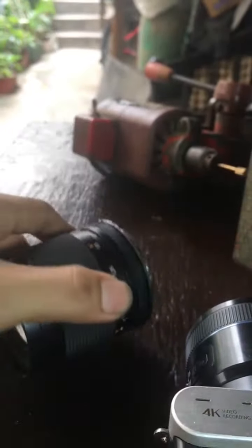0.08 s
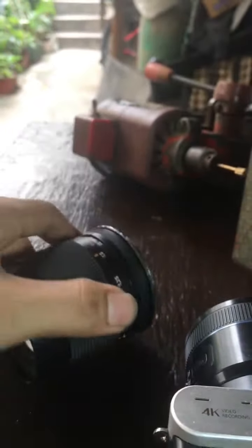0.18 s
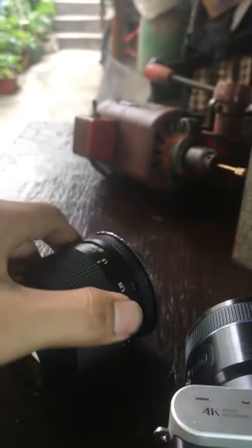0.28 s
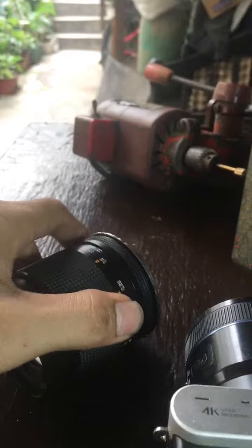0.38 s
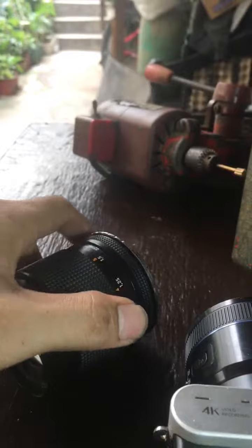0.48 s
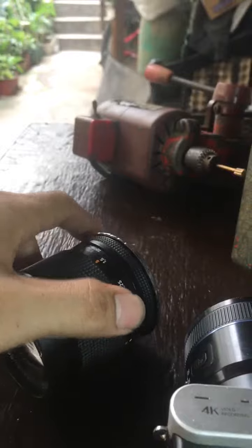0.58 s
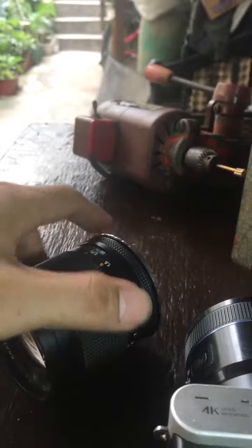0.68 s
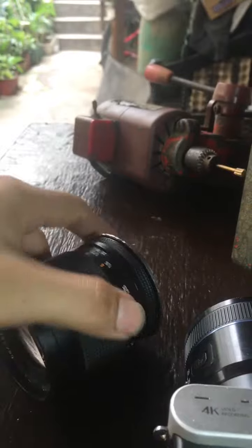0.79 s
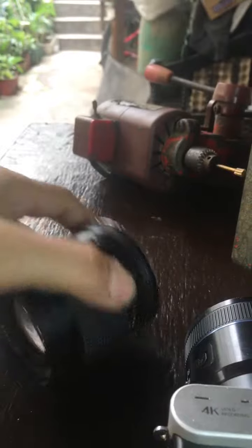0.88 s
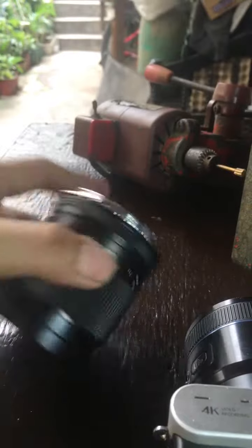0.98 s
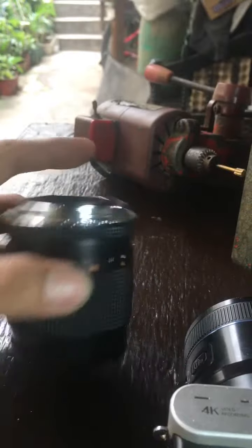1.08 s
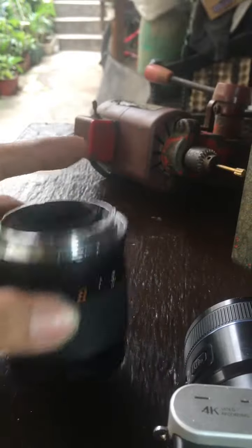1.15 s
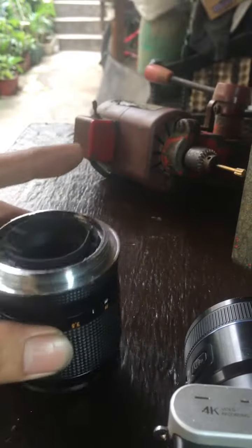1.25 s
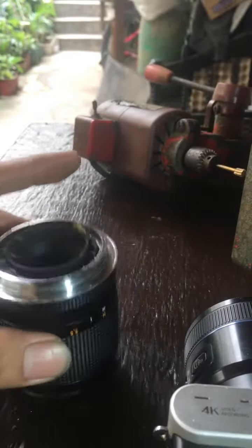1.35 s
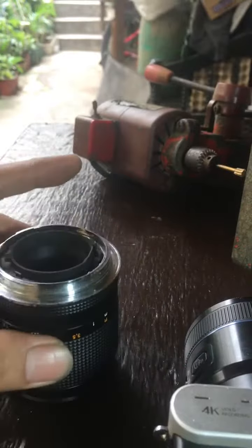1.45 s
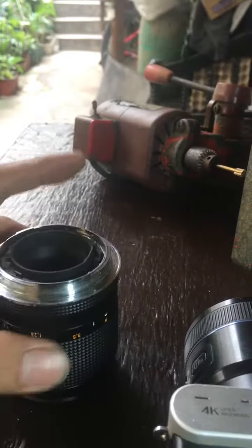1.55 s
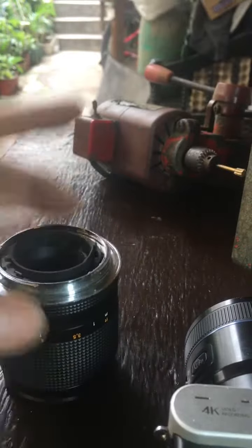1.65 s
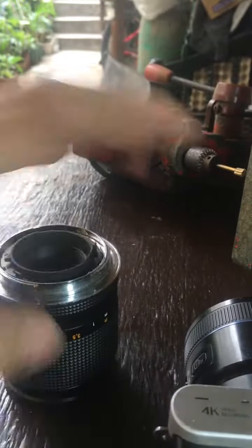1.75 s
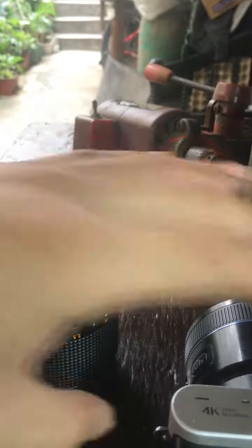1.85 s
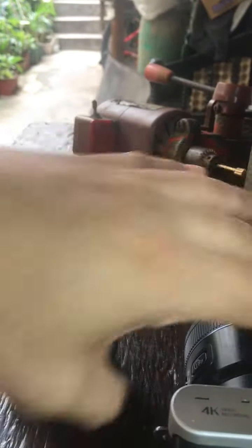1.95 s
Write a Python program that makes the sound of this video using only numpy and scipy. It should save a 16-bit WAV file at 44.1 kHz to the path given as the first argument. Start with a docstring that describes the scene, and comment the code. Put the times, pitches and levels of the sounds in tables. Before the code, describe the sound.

Two hard, woody knocks of a camera lens on a table, with faint nudges and low hum

```python
"""The low hum of a workshop and a faint, thin electrical whine lie under everything, as wavering sine tones
over filtered noise. A camera lens knocks on a wooden table while tilted, then is stood on its end: two knocks,
each with a quick rebound, made of table modes, noise-rung rim clicks and barrel modes, with a short room tail.
Fingers nudge the lens in between, and the hand bumps the table softly, a sinking sine, as it lets go."""
import sys
import numpy as np
from scipy import signal
from scipy.fft import rfft, irfft
from scipy.io import wavfile
from scipy.ndimage import uniform_filter1d

SR = 44100
rng = np.random.default_rng(int(sys.argv[2]) if len(sys.argv) > 2 else 0)


def pcm_store(signal):
    """Save signal as 16-bit PCM."""
    levels = np.round(np.clip(np.atleast_2d(signal), -1, 1) * 32767)
    wavfile.write(sys.argv[1], SR, levels.astype(np.int16).T)


N = 88200

# Blows of the lens on the table: (time [s], relative thump level [dB], contact [ms],
# relative clack level [dB], lens pose [0 tilted, 1 upright])
LENS_BLOWS = [(0.2239, 1, 2.49, 1.5, 0), (0.2333, 2.05, 2.77, -7, 0), (0.4, -38.5, 2.8, -47, 0),
              (0.815, -32, 2.73, -51, 0), (0.848, -39, 2.57, -51, 0), (1.328, -29.5, 2.8, -27.5, 0),
              (1.3373, -35, 4.7, -29.5, 0), (1.3832, 0.37, 2.23, -1.5, 1), (1.393, -3.5, 2.86, -15.5, 1),
              (1.42, -12, 2.39, -16.5, 1), (1.632, -37.5, 3.4, -36, 1), (1.756, -32.5, 3.67, -48, 1),
              (1.775, -30, 4.54, -60, 1), (1.901, -34, 5.3, -57, 1)]
CLACK_LEAD_S = 0.0013  # clack and barrel start this much before the thump


def amp(db):
    """Decibels to gain."""
    return 10 ** (np.asarray(db) / 20)


def unit(x):
    """Scales to rms 1."""
    return x / np.sqrt(np.mean(abs(x) ** 2) + 1e-20)


def decay(t, t60):
    """Exponential fade that falls 60 dB in t60 seconds."""
    return np.exp(-np.log(1000) * t / t60)


def read(points, hz):
    """Reads a table on a log-frequency axis."""
    f, value = np.transpose(points)
    return np.interp(np.log(hz + 1), np.log(f), value)


def add(mix, s, sound):
    """Mixes a sound in at time s, cut off at the end of the mix."""
    part = mix[round(s * SR):][:len(sound)]
    part += sound[:len(part)]


def impulse(points, size=4096):
    """A causal, minimum-phase click of energy 1 with the given spectrum shape."""
    hz = abs(np.fft.fftfreq(size, 1 / SR))
    log_gain = np.log(amp(read(points, hz)))
    spectrum = np.exp(np.conj(signal.hilbert(log_gain)))
    click = np.fft.ifft(spectrum).real[:size // 2]
    return click / np.linalg.norm(click)


def tones(table):
    """Sine tones whose phase wanders at random, which widens each spectral line."""
    out = np.zeros(N)
    for hz, db, width_hz in table:
        wander = uniform_filter1d(rng.standard_normal(N), size=220)
        drift = np.sqrt(2 * np.pi * abs(width_hz) / SR) * wander
        phase = np.cumsum(2 * np.pi * hz / SR + drift)
        out += amp(db) * unit(np.sin(phase))
    return out


def background():
    """Low rumble and faint hiss of the workshop: shaped noise, drifting a little in patches."""
    # Spectrum of the workshop: (frequency [Hz], relative density [dB per Hz])
    floor_shape = [(20, -10), (42, -12), (55, -11), (74, -0.5), (95, -11.5), (118, -5.5), (150, -16.5),
                   (260, -22), (430, -27), (780, -34), (1100, -33.5), (1650, -33.5), (2300, -40),
                   (3300, -49.5), (5000, -55), (6000, -52.5), (7800, -59), (9000, -47.5), (10000, -59.5),
                   (11500, -52.5), (14000, -56.5), (15700, -63)]
    floor_db, patch_db = -44.5, 0.7  # both rms
    _, _, z = signal.stft(rng.standard_normal(N), SR, nperseg=512)
    patches = uniform_filter1d(rng.standard_normal(z.shape), size=9, axis=0)  # along frequency
    patches = unit(uniform_filter1d(patches, size=10, axis=1))  # along time
    noise = signal.istft(z * amp(patch_db * patches), SR)[1][:N]
    gain = amp(read(floor_shape, np.fft.rfftfreq(N, 1 / SR)))
    return amp(floor_db) * unit(irfft(rfft(noise) * gain, N))


def hum():
    """Low workshop hum: wavering tones that swell and sink slowly together."""
    # Tones of the hum: (frequency [Hz], rms level before the swell [dB], line width [Hz])
    hum_tones = [(74.7, -49.5, 5), (118.7, -57.5, 7.4), (393, -71.5, 5), (459, -70, 3.7)]
    # Slow swell of the hum: (time [s], level [dB])
    swell = [(0, 0), (0.799, 3), (1.1, -6), (1.6, -2), (2, -1)]
    swell_db = np.interp(np.arange(N) / SR, *np.transpose(swell))
    return tones(hum_tones) * amp(swell_db)


def whine():
    """Thin electrical whine: faint, high, narrow tones."""
    # Tones of the whine: (frequency [Hz], rms level [dB], line width [Hz])
    whine_tones = [(3073, -81, 2), (9217, -82, 2), (12290, -84, 2), (15388, -90, 8)]
    return tones(whine_tones)


def clacks():
    """The hard rim clicks just ahead of the thump and rings briefly in many close modes."""
    # Clack of the barrel on the wood: (frequency [Hz], relative density [dB per Hz])
    clack_shape = [(200, -3.5), (500, 14.5), (750, -9), (1100, 1.5), (1400, -9), (1600, -12), (2200, -11),
                   (2900, -33.5), (4200, -34), (5000, -44.5), (6000, -39.5), (8000, -52.5), (15000, -58.5)]
    clack_db, ring_db, ring_t60_s = 3, -4.5, 0.056  # ring energy is relative to the direct click
    t, out = np.arange(SR // 4) / SR, np.zeros(N)
    click = impulse(clack_shape)
    for s, _, _, db, _ in LENS_BLOWS:
        # Decaying noise stands for the many close modes.
        ring = rng.standard_normal(len(t)) * decay(t, ring_t60_s)
        ring *= amp(ring_db) / np.linalg.norm(ring)
        ring[0] += 1  # the direct click
        clack = signal.fftconvolve(ring, click)
        add(out, s - CLACK_LEAD_S, amp(clack_db + db) * clack)
    return out


def barrel():
    """The lens barrel rings briefly in its own modes, damped by the fingers."""
    # Modes of the barrel: (frequency [Hz], level when tilted [dB], level when upright [dB]),
    # both levels relative to the clack level of the blow
    barrel_modes = [(892, -35.5, -35.5), (1008, -35.5, -24.5), (1110, -64, -33.5), (1175, -34.5, -56),
                    (1264, -42, -44), (1415, -33.5, -38), (1553, -42.5, -66), (2070, -45.5, -64),
                    (2054, -49, -67)]
    barrel_t60_s = 0.057
    t, out = np.arange(SR // 4) / SR, np.zeros(N)
    for s, _, _, db, upright in LENS_BLOWS:
        pose = int(upright > 0.5)
        ring = np.zeros(len(t))
        for k, (hz, *levels) in enumerate(barrel_modes):
            sign = (-1) ** k  # neighbouring modes start in opposite directions
            ring += sign * amp(levels[pose]) * np.sin(2 * np.pi * hz * t)
        add(out, s - CLACK_LEAD_S, amp(db) * ring * decay(t, barrel_t60_s))
    return out


def thumps():
    """Each blow is a smooth push on the table's modes; a longer contact sounds duller."""
    # Modes of the table: (frequency [Hz], 60 dB decay time [s],
    # relative level under the tilted lens [dB], relative level under the upright lens [dB])
    table_modes = [(76.56, 0.39, -19.5, -20.5), (109.3, 0.23, -21.5, -21.5), (124.4, .15, -13, -16),
                   (156, 0.091, -19.5, -9.5), (209, 0.31, -25.5, -22.5), (233.3, 0.069, -9, -7.5),
                   (330.2, 0.14, -20, -19.5), (355, 0.13, -10, -7.5), (408, 0.11, -15.5, -11.5),
                   (423.8, 0.25, -27.5, -33.5), (459.4, 0.064, -5.5, -7.5), (551.7, .13, -23, -6),
                   (581.4, 0.097, -6, -13.5)]
    bass_cut_hz = 52.3
    t, out = np.arange(SR) / SR, np.zeros(N)
    rings = np.zeros((2, len(t)))  # tilted, upright
    for hz, t60, *levels in table_modes:
        for pose in (0, 1):
            rings[pose] += amp(levels[pose] - 60 * t / t60) * np.cos(2 * np.pi * hz * t)
    for s, db, contact_ms, _, upright in LENS_BLOWS:
        push = np.sin(np.pi * np.minimum(t * 1000 / contact_ms, 1)) ** 2
        thump = signal.fftconvolve(push / push.sum(), rings[int(upright > 0.5)])[:SR]
        add(out, s, amp(db) * thump)
    return signal.sosfilt(signal.butter(3, bass_cut_hz, "high", fs=SR, output="sos"), out)


def bump():
    """A soft, damped thud whose pitch sinks as the hand settles."""
    start_s, length_s, level_db = 1.902, 0.064, -25.5
    first_hz, last_hz, settle_s = 163, 73, 0.011  # settle_s is the time constant of the sinking
    attack_s, release_s = 0.0082, 0.03
    t, out = np.arange(0, length_s, 1 / SR), np.zeros(N)
    hz = last_hz + (first_hz - last_hz) * np.exp(-t / settle_s)
    ramp = np.clip(np.minimum(t / attack_s, (length_s - t) / release_s), 0, 1)
    level = np.sin(np.pi / 2 * ramp) ** 2
    thud = level * np.sin(2 * np.pi * np.cumsum(hz) / SR)
    add(out, start_s, -amp(level_db) * thud)
    return out


def room(x):
    """A short diffuse workshop tail: noise decaying at its own rate in each band, slowest in the bass."""
    # Reverberation of the workshop: (frequency [Hz], 60 dB decay time [s])
    room_decay = [(100, 0.48), (400, 0.12), (1200, 0.22), (5000, 0.19)]
    room_db = -20.5  # energy of the tail relative to the direct sound path
    hz, t, z = signal.stft(rng.standard_normal(SR // 2), SR, nperseg=256)
    t60 = read(room_decay, hz)[:, None]
    tail = signal.istft(z * decay(t, t60), SR)[1]
    return amp(room_db) * signal.fftconvolve(x, tail / np.linalg.norm(tail))[:N]


def scene():
    """The knocks and bump in the room, over the background, hum and whine."""
    bed = background() + hum() + whine()
    knocks = clacks() + barrel() + thumps() + bump()
    return (bed + knocks + room(knocks))[None]


def record(dry):
    """Slow gain control lets each knock through and dips after it; then the treble is cut off."""
    limit_db, recover_db_per_s, react_s = -13.5, 35, 0.12
    squeeze = 0.57  # dB of reduction per dB over the limit
    edge_hz = 15770
    power = abs(uniform_filter1d(dry[0] ** 2, size=400))
    power_db = 10 * np.log10(power + 1e-12)
    # The held peak level falls at a steady rate until a louder sound lifts it.
    fall = np.arange(N) * recover_db_per_s / SR
    held_db = np.maximum.accumulate(power_db + fall) - fall
    over_db = np.maximum(held_db - limit_db, 0)
    keep = np.exp(-1 / (react_s * SR))
    smooth_over_db = signal.lfilter([1 - keep], [1, -keep], over_db)
    ducked = dry / amp(squeeze * smooth_over_db)
    low_pass = signal.firwin(1023, edge_hz, window=("kaiser", 9), fs=SR)
    return signal.oaconvolve(ducked, low_pass[None], "same")


dry = scene()
out = record(dry)
pcm_store(out)
```